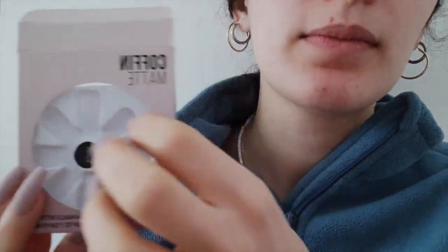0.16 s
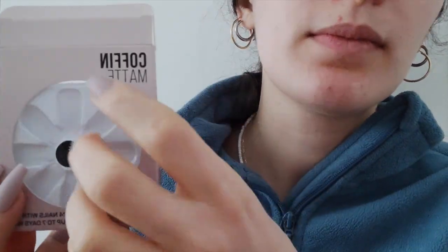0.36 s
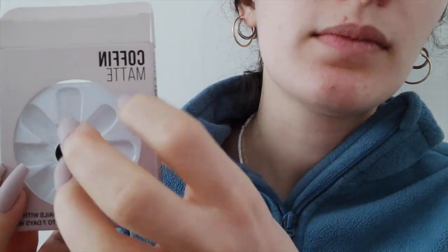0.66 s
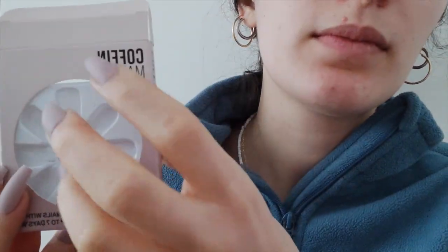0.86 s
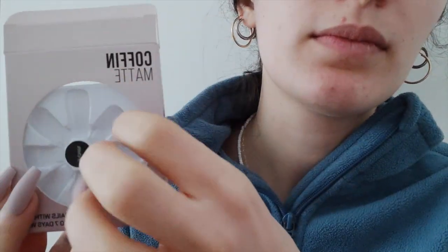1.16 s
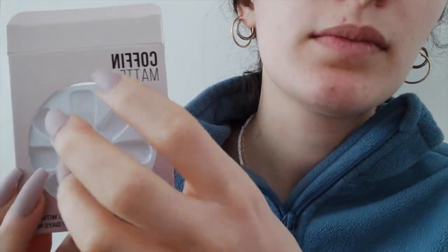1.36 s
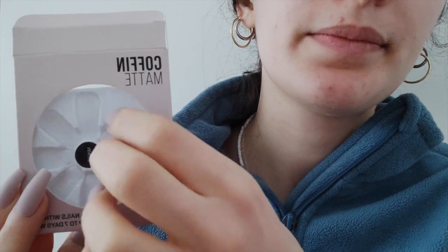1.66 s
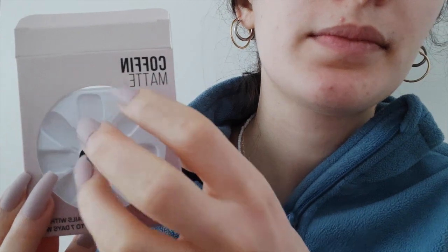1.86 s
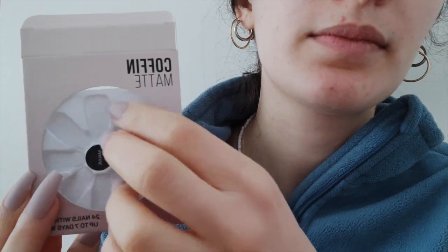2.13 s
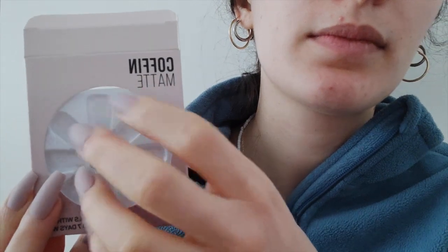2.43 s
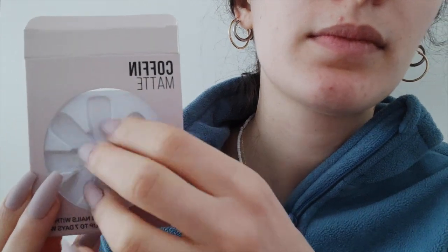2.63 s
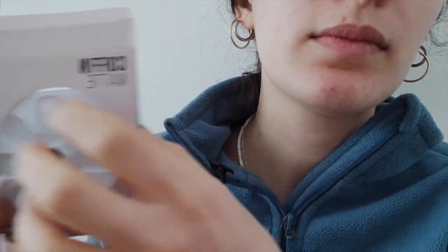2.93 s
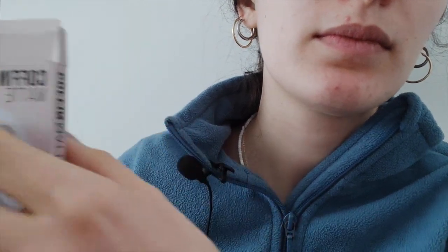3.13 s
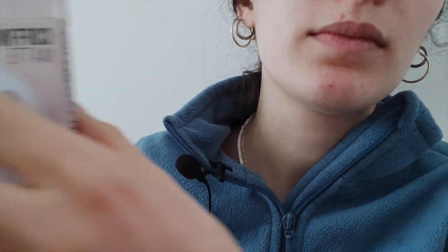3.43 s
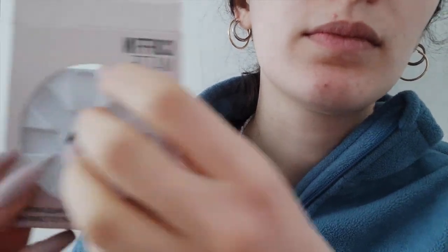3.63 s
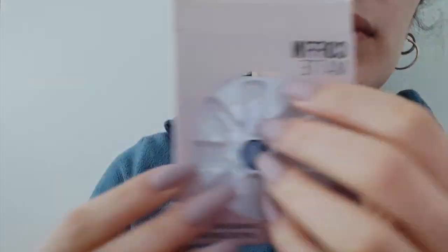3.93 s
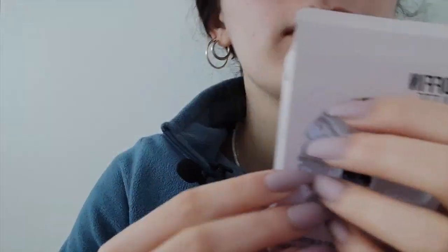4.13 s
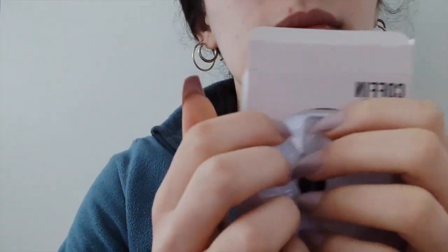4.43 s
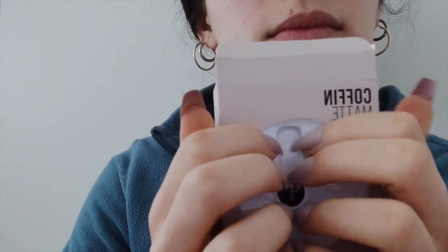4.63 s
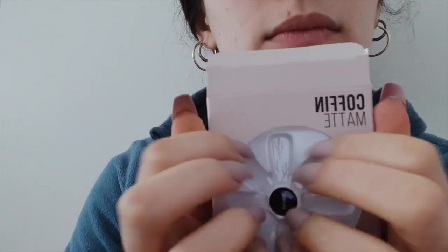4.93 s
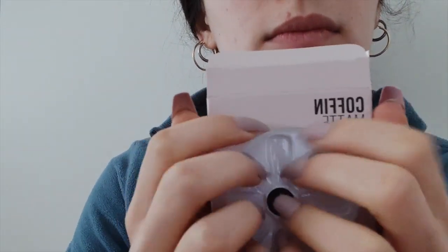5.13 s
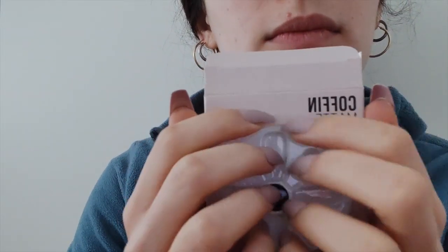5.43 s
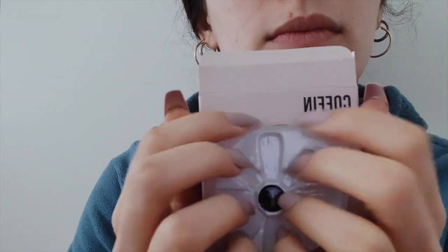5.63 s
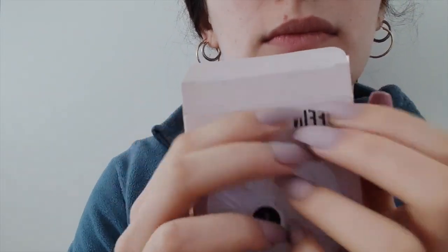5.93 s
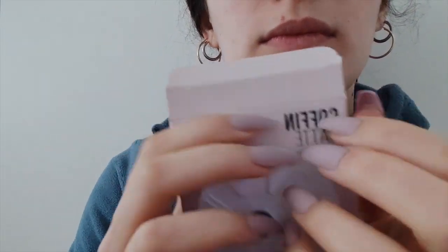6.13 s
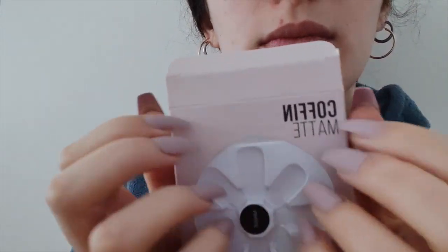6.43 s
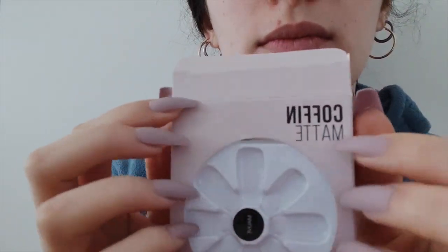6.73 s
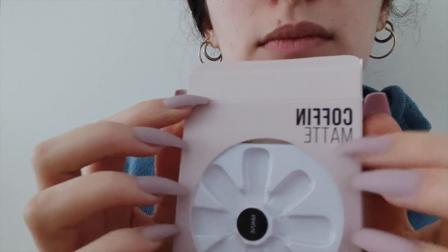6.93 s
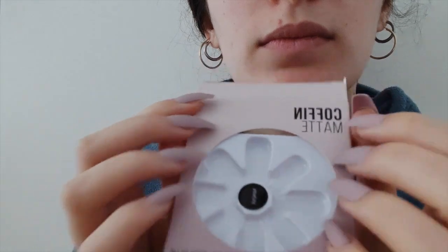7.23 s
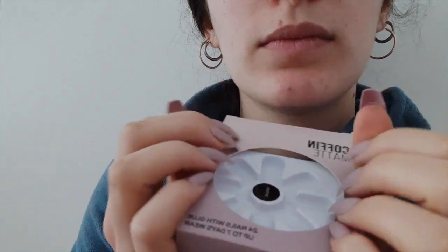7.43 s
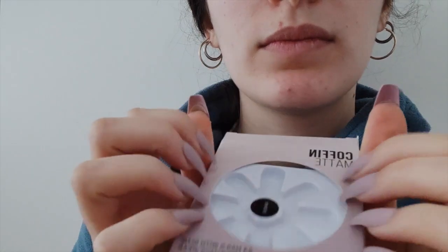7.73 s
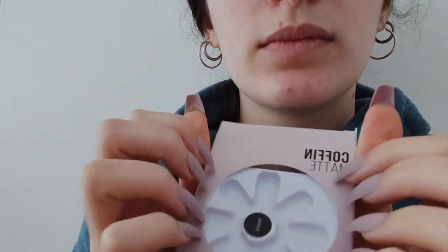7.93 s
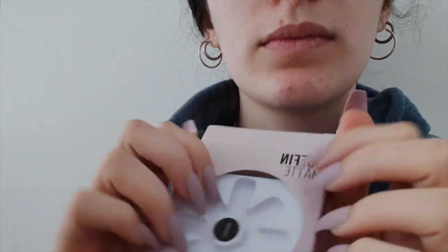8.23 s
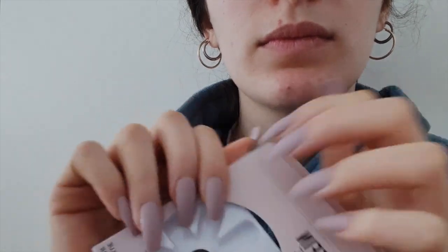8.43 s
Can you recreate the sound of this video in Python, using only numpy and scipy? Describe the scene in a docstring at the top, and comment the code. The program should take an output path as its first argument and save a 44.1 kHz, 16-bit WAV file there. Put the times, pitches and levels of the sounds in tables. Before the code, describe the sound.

Very close stereo pickup of long hard nails on a small card box with a thin plastic tray. Loose quick runs of bright, hollow clicks sit slightly left, pause as the box swings aside, then move near centre as both hands tap, scratch and rub. Later taps get softer and sparser, with faint edge rustling. Quiet small room, low rumble behind.

```python
"""Long false nails drum on a small cardboard box with a plastic tray in its window, close to a two-port microphone.
Each tap knocks the tray, thumps the box and clicks the nail: damped resonances struck by one contact and a rebound.
One hand drums in runs with the box held to the left; then both hands tap, scratch and rub card and plastic in front.
Scratches are random catches and slips ringing the thin walls.
A quiet, slightly live room with a low rumble lies behind."""
import sys
import numpy as np
from scipy import signal
from scipy.fft import rfft, irfft
from scipy.io import wavfile

SR = 44100
rng = np.random.default_rng(int(sys.argv[2]) if len(sys.argv) > 2 else 0)


def generate_wav(signal):
    """Clip the signal to [-1, 1] and save it as 16-bit WAV at the path in sys.argv[1]."""
    frames = np.transpose(np.atleast_2d(signal))
    scaled = np.clip(frames, -1, 1) * 32767
    pcm = np.round(scaled).astype(np.int16)
    wavfile.write(sys.argv[1], SR, pcm)


N = 378378

# one short sound is SIZE samples long; HZ are its frequencies (offset by 1 to avoid zero), AGE its seconds
SIZE = 4096
HZ = np.arange(SIZE // 2 + 1) * SR / SIZE + 1
AGE = np.arange(SIZE) / SR
# the box swings to the front at TURN_S; from EDGE_S on the fingers work along its edges
TURN_S, EDGE_S = 4.0, 6.5
# an ordinary tap: tray knock, nail click and box thump (dB), pitch of the struck spot (Hz)
USUAL_TRAY_DB, USUAL_NAIL_DB, USUAL_BOX_DB, USUAL_HZ = -40.5, -43.5, -49.5, 1300

# Clear nail taps. Each row: start in seconds, tray knock in dB, pitch of the struck spot in Hz,
# nail click in dB; both levels come before the overall lift in taps().
TAP_ROWS = [(0.054, -43, 1200, -58), (0.071, -35.5, 1270, -38), (0.1502, -43, 1200, -41.5),
            (0.155, -31.5, 1290, -58), (0.1874, -45, 1560, -47), (0.23, -35.5, 1590, -42),
            (0.3053, -45.5, 930, -54), (0.4682, -45, 1350, -66), (0.4932, -35, 1390, -47),
            (0.5519, -40, 2130, -40.5), (0.634, -44, 1830, -48), (0.639, -39.5, 1300, -45),
            (0.6738, -41.5, 960, -52.5), (1.0262, -40, 1160, -53), (1.077, -33.5, 1360, -41),
            (1.092, -36.5, 1330, -44.5), (1.1589, -38, 1510, -40.5), (1.2334, -35, 1240, -44.5),
            (1.2784, -40.5, 1010, -48.5), (1.5291, -39, 1080, -59.5), (1.643, -30.5, 1370, -43.5),
            (1.702, -44, 1200, -42.5), (1.8162, -39.5, 980, -49.5), (2.0231, -49, 1170, -55.5),
            (2.043, -40.5, 1150, -66), (2.167, -47, 1220, -56), (2.223, -46.5, 1220, -45.5),
            (2.261, -46, 1800, -52), (2.3562, -39.5, 1250, -46.5), (2.407, -41.5, 1000, -52.5),
            (2.6026, -34.5, 1220, -46), (2.6705, -49, 1320, -51.5), (2.725, -36.5, 1490, -51),
            (2.869, -46.5, 1170, -50.5), (3.086, -41, 1320, -52), (3.108, -38.5, 620, -49),
            (3.1473, -42, 2650, -58.5), (3.3141, -45, 1670, -51.5), (3.5752, -42, 1000, -49.5),
            (3.6255, -46.5, 1600, -47.5), (3.6319, -33.5, 1170, -64), (3.6951, -47.5, 1740, -80),
            (3.7777, -36, 1030, -39.5), (3.9327, -43.5, 1030, -56.5), (3.9502, -37.5, 1015, -83),
            (4.1002, -46.5, 870, -43), (4.1662, -45.5, 1150, -45.5), (4.1779, -47, 1150, -52),
            (4.195, -44.5, 1630, -46.5), (4.2635, -44, 2060, -50.5), (4.3815, -65, 1060, -42.5),
            (4.5136, -46.5, 1470, -56), (4.5698, -52, 1300, -52), (4.82, -33.5, 1650, -41.5),
            (4.8618, -43, 1320, -55), (4.971, -40, 1690, -44), (5.0691, -48.5, 1300, -64),
            (5.099, -46.5, 1200, -54), (5.1324, -40.5, 1210, -57), (5.1799, -45.5, 1350, -53.5),
            (5.234, -47.5, 1840, -42), (5.2429, -40.5, 1350, -41.5), (5.376, -46, 1490, -57),
            (5.4496, -37, 1510, -53), (5.4744, -47.5, 1600, -65), (5.494, -69, 1300, -52),
            (5.5123, -52.5, 1220, -47.5), (5.6191, -39, 1760, -55), (5.6287, -40, 1130, -51.5),
            (5.654, -46.5, 1220, -54.5), (5.7417, -46.5, 726, -41.5), (5.8137, -54, 1500, -50),
            (5.8919, -44.5, 1230, -42), (5.9749, -45.5, 1300, -44), (6.0917, -41.5, 1590, -46),
            (6.103, -47, 1160, -49), (6.182, -46.5, 1160, -44.5), (6.2547, -46.5, 1580, -51),
            (6.3074, -46.5, 1140, -51.5), (6.3304, -39.5, 1300, -47), (6.3373, -41.5, 1950, -48),
            (6.416, -39.5, 1000, -37), (6.563, -40, 1250, -39), (6.6097, -54.5, 1050, -51),
            (6.684, -53.5, 1640, -50), (6.8729, -55, 1040, -49), (6.9475, -53.5, 1150, -46.5),
            (7.0993, -55.5, 1590, -52.5), (7.1782, -46.5, 1050, -43.5), (7.488, -62, 1440, -51),
            (7.774, -56, 826, -43.5), (7.8099, -68, 1500, -48.5), (7.838, -53.5, 1570, -42),
            (8.0142, -52.5, 2040, -45.5), (8.109, -65, 1500, -58), (8.134, -50.5, 696, -46),
            (8.18, -43.5, 1780, -56), (8.2257, -45, 1350, -43.5), (8.301, -56.5, 1450, -52.5)]


def undb(db):
    """Decibels to gain."""
    return 10 ** (np.asarray(db) / 20)


def unit(x):
    """Scale to an rms of one."""
    return x / np.sqrt(np.mean(np.abs(x) ** 2))


def colour(points, hz):
    """Gain at hz of a spectrum given as (Hz, dB) points, joined along log frequency."""
    f, db = np.transpose(points)
    return undb(np.interp(np.log(hz), np.log(f), db))


def tint(x, gain):
    """Filter a whole track by a function of frequency."""
    hz = np.arange(N // 2 + 1) * SR / N + 1
    return irfft(rfft(x) * gain(hz), N)


def resonance(hz, q):
    """Gain of a resonance with steep skirts, sharper as q rises."""
    return 1 / (1 + (q * (HZ / hz - hz / HZ)) ** 2)


def causal(gain):
    """Minimum-phase response with this gain: sharp front, ringing after."""
    cepstrum = irfft(np.log(gain + 1e-9))
    # fold the later half of the cepstrum onto the earlier half
    fold = (1 + np.sign(SIZE // 2 - np.arange(SIZE))) / (1 + (AGE == 0))
    return np.exp(rfft(cepstrum * fold))


def pair(count, apart_hz):
    """Noise at two ports: alike in the bass, unrelated from apart_hz up."""
    shared, side = rng.standard_normal((2, count))
    hz = np.arange(count // 2 + 1) * SR / count
    side = irfft(rfft(side) * np.minimum(hz / apart_hz, 1), count)
    return unit(np.array([shared + side, shared - side]))


def add(out, s, sound):
    """Mix a sound in at time s; the box is held to the left at first, then nearly in front."""
    # the right port hears the box later (samples) and softer (dB)
    lag, left_db = (12, 2.2) if s < TURN_S else (4, .7)
    left_start = int(s * SR)
    starts = (left_start, left_start + lag)
    for port, start, db, heard in zip(out, starts, (left_db / 2, -left_db / 2), sound):
        part = heard[:N - start]
        port[start:start + len(part)] += undb(db) * part


def room_tone(level_db=-58.5):
    """Low rumble, alike at both ports, under a faint hiss that is not."""
    # Spectrum of the still room. Each row: frequency in Hz, relative density in dB per Hz.
    still_room = [(24, 6), (33, -1.5), (55, 4), (120, -9.5), (240, -19), (600, -23.5), (2700, -33),
                  (7500, -41.5), (10500, -45), (14000, -39.5)]
    mid = tint(rng.standard_normal(N), lambda hz: colour(still_room, hz))
    side = tint(rng.standard_normal(N), lambda hz: colour(still_room, hz) * np.clip(hz / 1500, .3, 1))
    return undb(level_db) * unit(np.array([mid + side, mid - side]))


def arm_swing(out_s=3.06, back_s=3.53, width_s=0.093, level_db=-52, top_hz=98,
              card_hz=430, card_width_hz=60, card_db=-21):
    """Sleeve and hands rumble as the box is swung aside and back, and the card hums faintly with them."""
    def shape(hz):
        rumble = 1 / (1 + (hz / top_hz) ** 3)
        card = undb(card_db) / (1 + ((hz - card_hz) / card_width_hz) ** 2)
        return rumble + card

    t = np.arange(N) / SR
    speed = sum(1 / (1 + ((t - s) / width_s) ** 2) for s in (out_s, back_s))
    return undb(level_db) * unit(tint(pair(N, apart_hz=500), shape)) * speed


def reflections(dry, wet_db=-13, t60_s=0.3, build_s=0.0095, thin_hz=1200):
    """The walls of a small room answer with decaying noise; the small box throws out little bass."""
    t = np.arange(SR // 2) / SR
    fade = undb(-60 * t / t60_s) * np.minimum(t / build_s, 1) ** 2
    tail = unit(pair(len(t), apart_hz=1000) * fade) / np.sqrt(len(t))
    answer = signal.fftconvolve(dry, tail, axes=1)[:, :N]
    return undb(wet_db) * tint(answer, lambda hz: hz / np.hypot(hz, thin_hz))


def walls(s, q=10, spread_db=3.5, bend=0.051):
    """Gain of the walls at time s: every spot favours other modes, and the pressing fingers bend them a little."""
    # Modes of the thin walls, shifted by the grip. Each row: Hz held to the side, Hz gripped in front,
    # Hz held by the edges, typical lift in dB.
    wall_modes = [(640, 594, 374, -1.5), (1340, 1104, 1705, -1), (2397, 2073, 3260, -3.5),
                  (3136, 3510, 4100, 0.5)]
    grip = int(s > TURN_S) + int(s > EDGE_S)
    gain = 1
    for mode, (favour, press) in zip(wall_modes, rng.standard_normal((len(wall_modes), 2))):
        lift = undb(mode[-1] + spread_db * favour)
        gain = gain + lift * resonance(mode[grip] * (1 + bend * press), q)
    return gain


def scrape(s, seconds, hardness, slips_per_s=2200, spread_db=5.5, grip_db=4, grip_s=0.00693,
           edge_s=0.0041, smear_s=0.0063, sing=1.29):
    """A nail tip catches and slips on the grain; its grip comes and goes, and the slips keep the walls singing."""
    # Card and plastic under a sliding nail. Each row: frequency in Hz, relative level in dB.
    rub_colour = [(120, -3.5), (300, -5), (1000, 4.5), (1900, 2.5), (4000, -4), (5300, -5.5), (7500, -3),
                  (10000, -20.5), (13000, -23)]
    t = np.arange(int(seconds * SR)) / SR
    catch, strength, direction = rng.random((3, SR))[:, :len(t)]
    slips = (catch < slips_per_s / SR) * undb(spread_db * np.minimum(-np.log(strength), 4.5))
    friction = slips * np.sign(direction - .5) + 1e-9
    knots = np.arange(0, seconds + grip_s, grip_s)
    grip = undb(grip_db * np.interp(t, knots, rng.standard_normal(SIZE)[:len(knots)]))
    grip *= np.clip(np.minimum(t, seconds - t) / edge_s, 0, 1)
    echoes = rfft((AGE == 0) + np.exp(-AGE / smear_s) * pair(SIZE, apart_hz=3460) / 10)
    # hardness of the contact is in dB per octave
    tilt = undb(hardness * np.log2(np.clip(HZ, 700, 13000)))
    # the tip travels from one spot to another, so one set of modes fades into the next
    sound = 0
    for share in (1 - t / seconds, t / seconds):
        body = unit(irfft(echoes * causal(colour(rub_colour, HZ) * tilt * walls(s) ** sing)))
        sound = sound + signal.fftconvolve((friction * grip * share)[None], body, axes=1)
    # unit rms over the length of the stroke, with the ringing counted in
    return unit(sound) * np.sqrt(len(t) / sound.shape[1])


def follow_through(drag_db=-20.0, drag_s=0.05, drag_hardness=-4.5, slips_per_s=500, spread_db=8.0):
    """After each tap the tip drags on a little, in gritty catches."""
    out = np.zeros((2, N))
    for s, tray_db, _, _ in TAP_ROWS:
        drag = scrape(s, drag_s, drag_hardness, slips_per_s, spread_db)
        add(out, s, undb(tray_db + drag_db) * drag)
    return out


def tap(s, tray_db, tray_hz, box_db, nail_db, tilt_db, chatter=0.14, chatter_s=0.0044, bounce=0.64,
        bounce_s=0.0054, hardness=0.14, tilt_spread_db=0.5, flex_s=0.0002):
    """One blow, a small rebound and fast-dying echoes inside the thin walls, voiced by tray, box and nail."""
    # Hollow cardboard box. Each row: frequency in Hz, relative level in dB.
    box_colour = [(90, -10.5), (180, -6), (280, -3.5), (410, -10.5), (510, -2), (630, -3), (800, -6),
                  (1300, -18.5), (2500, -40.5)]
    # Click of an acrylic nail. Each row: frequency in Hz, relative level in dB.
    nail_colour = [(900, -22), (1700, 2), (3200, 2.5), (5500, -0.5), (7300, 2.5), (8600, -2),
                   (10000, -17.5), (12600, -12), (15000, -20.5)]
    delay, rebound = rng.random(2)
    contact = 1. * (AGE == 0)
    contact[int(delay * min(bounce_s * SR, SIZE / 2)) + 1] += bounce * rebound
    echoes = chatter * np.exp(-AGE / chatter_s) * pair(SIZE, apart_hz=3670)
    # bending waves carry the treble ahead of the bass: flex_s is the delay at USUAL_HZ
    flex = np.exp(-4j * np.pi * flex_s * np.sqrt(HZ * USUAL_HZ))
    force = rfft(contact - echoes) * flex * causal(walls(s))
    tray = resonance(tray_hz, q=2.05) + undb(-16) * resonance(1.75 * tray_hz, q=1.8)
    # the more of a blow the nail tip takes, the brighter its click
    db_per_octave = tilt_db + hardness * (nail_db - tray_db) + tilt_spread_db * rng.standard_normal()
    octaves = np.log2(np.maximum(HZ, nail_colour[1][0]))
    nail = colour(nail_colour, HZ) * undb(db_per_octave * octaves)
    parts = ((tray, tray_db), (colour(box_colour, HZ), box_db), (nail, nail_db))
    power = sum((undb(db) * gain) ** 2 / np.mean(np.abs(gain * force) ** 2) for gain, db in parts)
    # levels are rms over the first hundredth of a second
    return -irfft(force * causal(np.sqrt(power))) * np.sqrt(SR / 100)


def light_tap(s, db, spot_hz=1400, spot_octaves=0.37, box_db=-4, nail_db=-14):
    """A gentle knock on a chance spot, box and nail set relative to the tray."""
    tray_hz = spot_hz * 2 ** (spot_octaves * rng.standard_normal())
    return tap(s, db, tray_hz, db + box_db, db + nail_db, tilt_db=0)


def rubbing(count=40, stroke_s=0.092, face_snag_db=5, edge_snag_db=-1, face_hardness=-0.71,
            edge_hardness=2.0, slips_per_s=500):
    """Strokes of the resting nails, snagging on ridges: dull ticks on the face, a harder rustle along the edges."""
    # Both hands rubbing the box. Each row: time in seconds, stroke level in dB.
    rub_levels = [(4.05, -80), (4.55, -62.5), (5.13, -70), (5.58, -78), (5.68, -65), (6.05, -64),
                  (6.3, -55.5), (6.6, -65), (6.879, -59), (7.349, -62), (7.68, -78.5), (7.85, -59.5),
                  (8.05, -71), (8.25, -57.5), (8.5, -79.5)]
    out = np.zeros((2, N))
    times, levels = np.transpose(rub_levels)
    starts = np.linspace(TURN_S, N / SR - 2 * stroke_s, count)
    for start, snags in zip(starts, rng.random((count, 2))):
        on_edge = start > EDGE_S
        hardness, snag_db = (edge_hardness, edge_snag_db) if on_edge else (face_hardness, face_snag_db)
        stroke_db = np.interp(start + stroke_s / 2, times, levels)
        add(out, start, undb(stroke_db) * scrape(start, stroke_s, hardness, slips_per_s))
        for s in start + stroke_s * snags:
            add(out, s, light_tap(s, np.interp(s, times, levels) + snag_db))
    return out


def scrapes(graze_s=0.0037, graze_hardness=-1.8):
    """Distinct scratches and brief grazes of a nail across card or plastic."""
    # Distinct scratches. Each row: start in seconds, length in seconds, level in dB,
    # hardness of contact in dB per octave.
    scratch_rows = [(0.558, 0.011, -35.5, -2), (1.155, 0.0049, -35.5, 34), (1.231, 0.0044, -32.5, 32),
                    (1.556, 0.14, -57.5, 1.5), (2.104, 0.055, -59, 0.5), (3.089, 0.022, -40.5, -3.5),
                    (3.344, 0.046, -52, 1), (4.065, 0.1, -50, -0.5), (4.247, 0.052, -48, 6.5),
                    (4.392, 0.03, -40.5, 5), (6.677, 0.041, -50.5, -2.5), (6.806, 0.136, -56.5, -0.5),
                    (6.984, 0.019, -49.5, 5.5), (7.044, 0.02, -53, 5), (7.262, 0.065, -52, 1.5),
                    (8.143, 0.058, -56.5, 2), (8.358, 0.087, -58.5, 1.5)]
    # A neighbouring nail skims the surface without a blow. Each row: start in seconds, level in dB.
    graze_rows = [(0.04, -50), (0.114, -44.5), (0.163, -45), (0.213, -51), (1.059, -44.5), (1.629, -43),
                  (1.656, -49), (2.71, -42), (3.296, -48.5), (3.429, -55), (3.559, -46.5), (4.004, -55.5),
                  (4.117, -49), (4.53, -49), (4.832, -50), (5.19, -44), (5.834, -44.5), (5.966, -49),
                  (6.139, -45.5), (7.43, -50), (7.928, -49), (8.123, -45.5), (8.198, -47)]
    out = np.zeros((2, N))
    for start, seconds, db, hardness in scratch_rows:
        add(out, start, undb(db) * scrape(start, seconds, hardness))
    for start, db in graze_rows:
        add(out, start, undb(db) * scrape(start, graze_s, graze_hardness))
    return out


def thump_db(s, tray_db, tray_hz, nail_db, ends_run, per_tray=0.63, per_nail=0.11, per_octave_db=1.0,
             two_hands_db=4.0, last_finger_db=-6):
    """The box thumps with the blow's force; more in the grip of both hands, less under the last finger of a run."""
    force_db = per_tray * (tray_db - USUAL_TRAY_DB) + per_nail * (nail_db - USUAL_NAIL_DB)
    pitch_db = per_octave_db * np.log2(tray_hz / USUAL_HZ)
    hold_db = two_hands_db if s > TURN_S else last_finger_db * ends_run
    return USUAL_BOX_DB + force_db + pitch_db + hold_db


def taps(level_db=1.0, side_tilt_db=0.0, front_tilt_db=-1.0, glint_hz=12400, glint_q=3, glint_db=-4,
         run_gap_s=.15, aside_s=3.0):
    """Fingers drum in loose runs; nail clicks are brighter and glint while the box is held to the side."""
    out = np.zeros((2, N))
    pauses = np.diff([row[0] for row in TAP_ROWS], append=N / SR)
    for (s, tray_db, hz, nail_db), pause in zip(TAP_ROWS, pauses):
        at_side = s < TURN_S
        # a pause longer than run_gap_s ends a run; the one-handed runs stop at aside_s
        ends_run = pause > run_gap_s and s < aside_s
        box_db = thump_db(s, tray_db, hz, nail_db, ends_run)
        glint = causal(1 + at_side * undb(glint_db) * resonance(glint_hz, glint_q))
        blow = tap(s, tray_db, hz, box_db, nail_db, side_tilt_db if at_side else front_tilt_db)
        add(out, s, undb(level_db) * irfft(glint * rfft(blow)))
    return out


def scene():
    """Taps, scratches and rubbing in the room."""
    background = room_tone() + arm_swing()
    nails = taps() + scrapes() + rubbing() + follow_through()
    return nails + reflections(nails) + background


def record(dry, port_hz=8300, port_width_hz=1700, port_db=1.5, body_hz=300, body_octaves=1.27,
           body_db=3.5, top_hz=14250):
    """The left port is brighter than the right around its resonance and fuller in the low mids; the top is cut."""
    # rows are left and right: shares of port_db and body_db
    def port_gain(hz):
        peak = port_db * np.array([[.5], [-1.5]]) * np.exp(-((hz - port_hz) / port_width_hz) ** 2)
        body = body_db * np.array([[.5], [-.5]]) * np.exp(-(np.log2(hz / body_hz) / body_octaves) ** 2)
        return undb(peak + body)

    top_cut = signal.ellip(8, .2, 70, top_hz, fs=SR, output="sos")
    return signal.sosfilt(top_cut, tint(dry, port_gain))


dry = scene()
out = record(dry)
generate_wav(out)
```